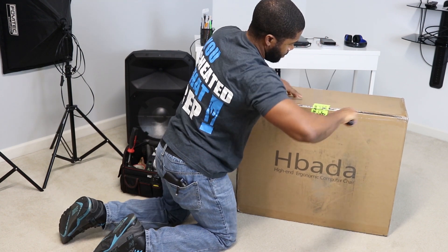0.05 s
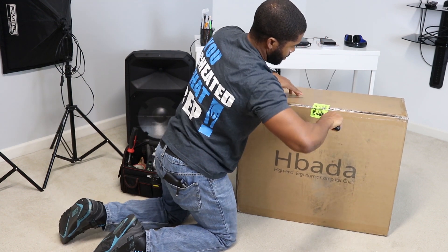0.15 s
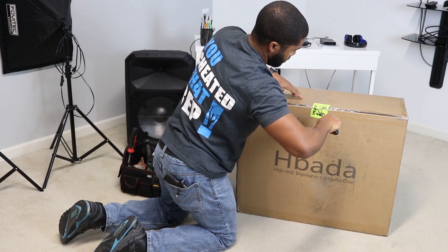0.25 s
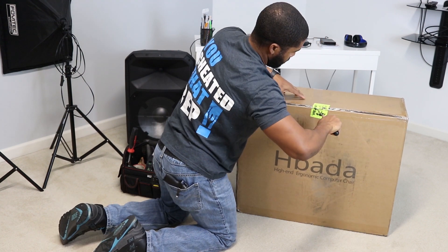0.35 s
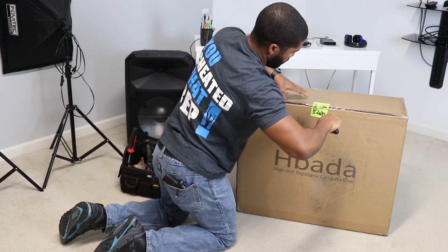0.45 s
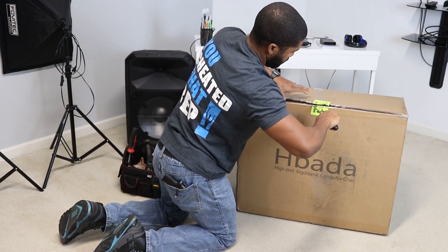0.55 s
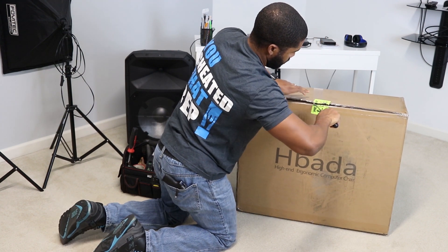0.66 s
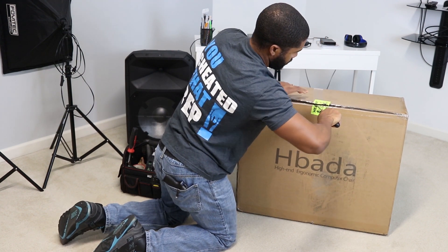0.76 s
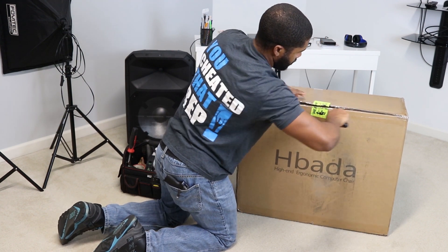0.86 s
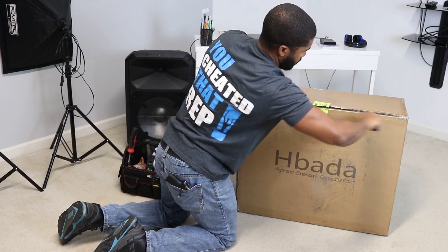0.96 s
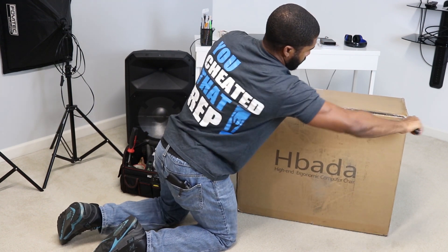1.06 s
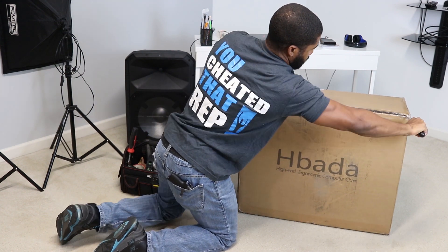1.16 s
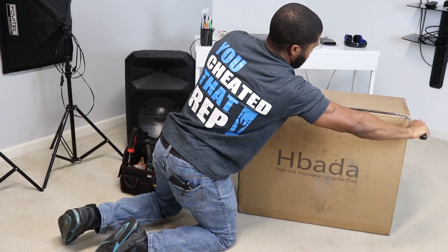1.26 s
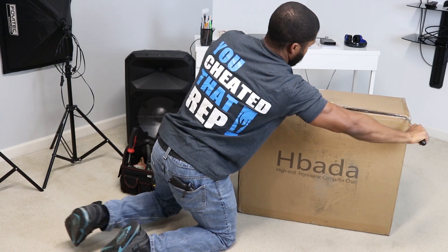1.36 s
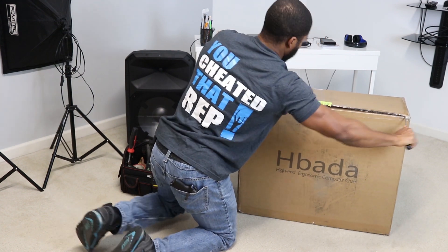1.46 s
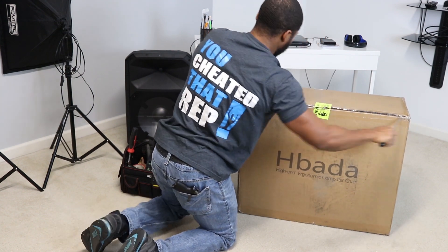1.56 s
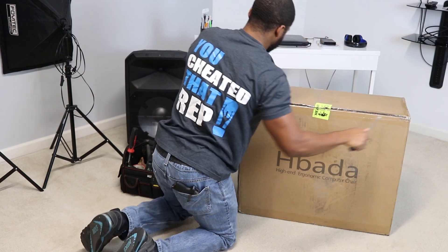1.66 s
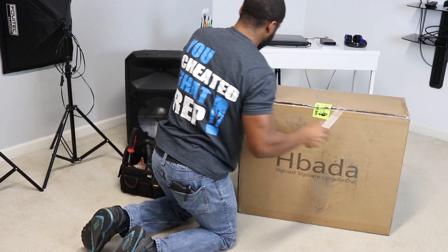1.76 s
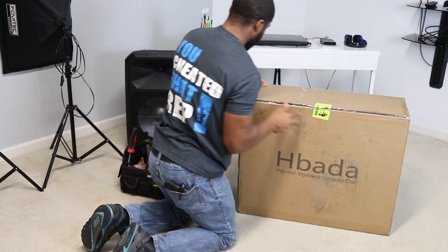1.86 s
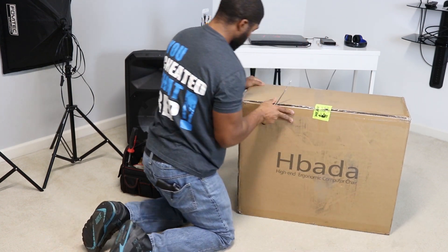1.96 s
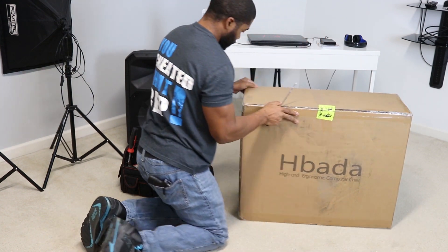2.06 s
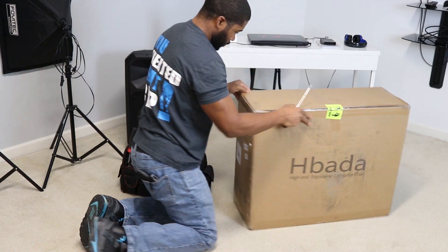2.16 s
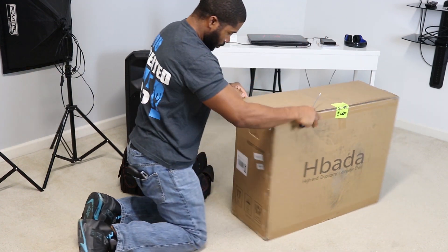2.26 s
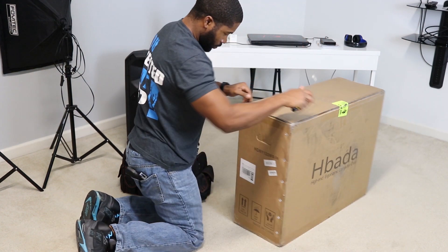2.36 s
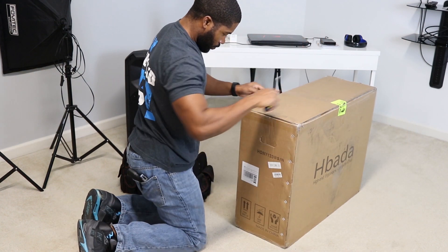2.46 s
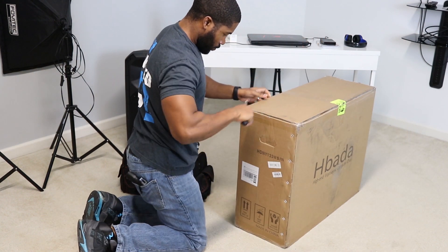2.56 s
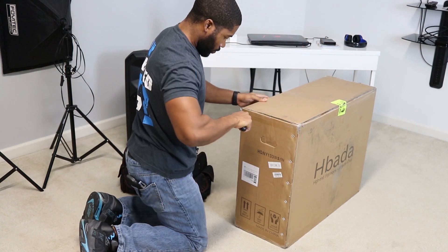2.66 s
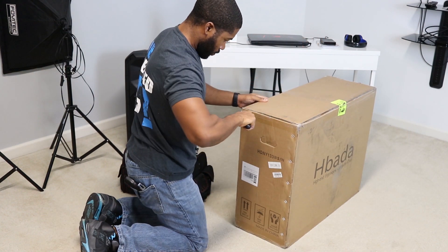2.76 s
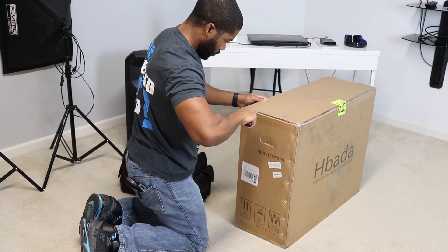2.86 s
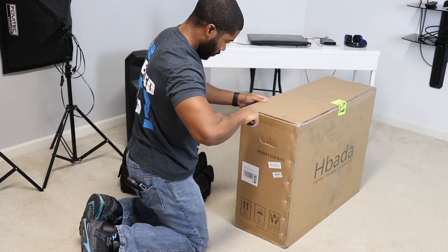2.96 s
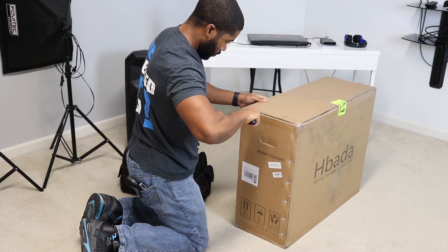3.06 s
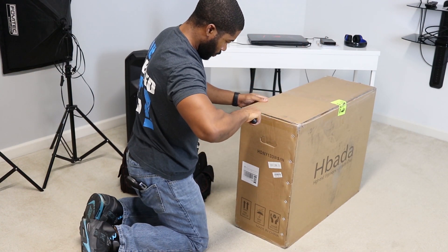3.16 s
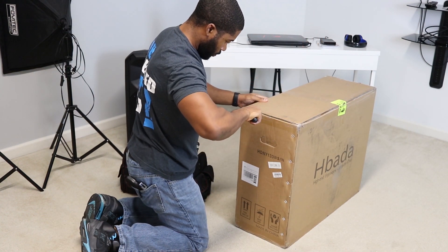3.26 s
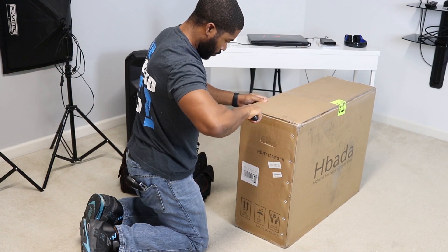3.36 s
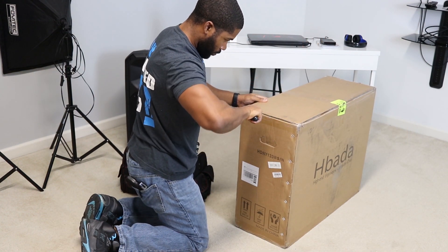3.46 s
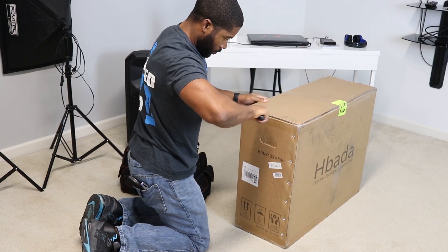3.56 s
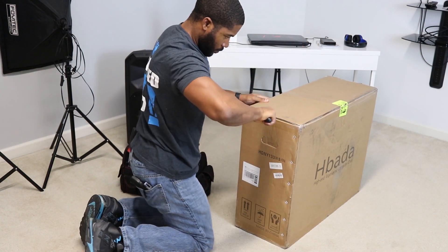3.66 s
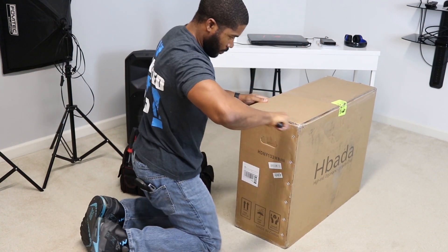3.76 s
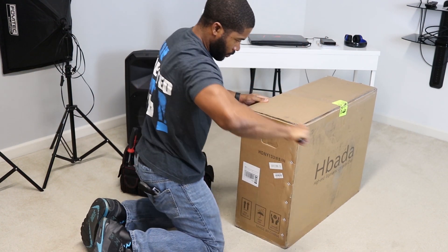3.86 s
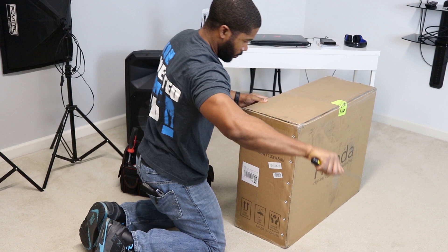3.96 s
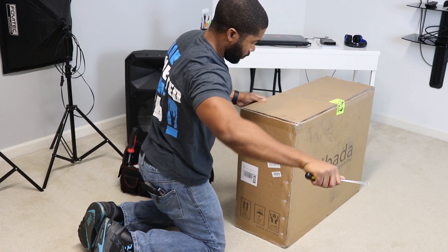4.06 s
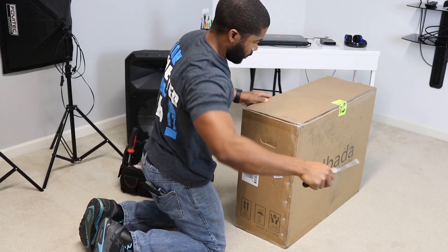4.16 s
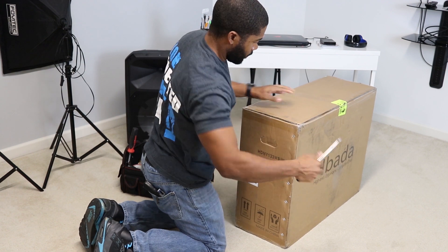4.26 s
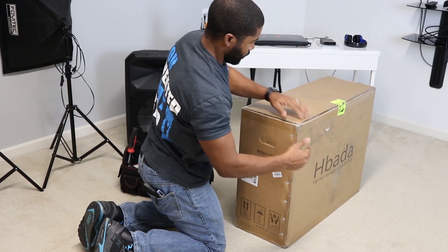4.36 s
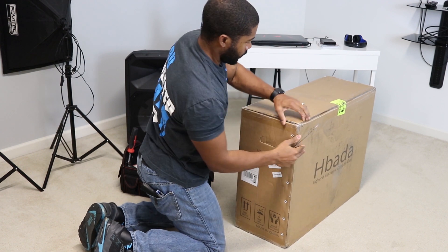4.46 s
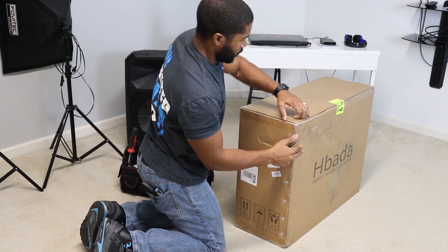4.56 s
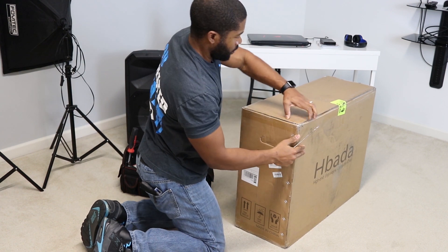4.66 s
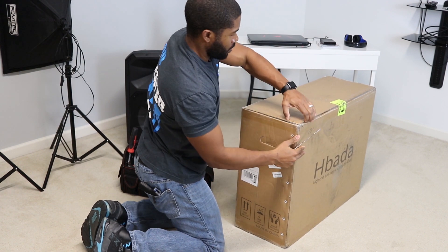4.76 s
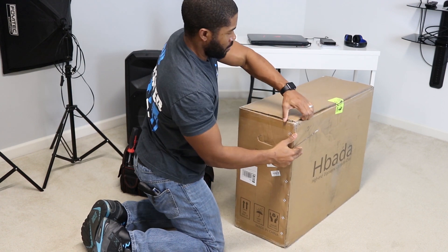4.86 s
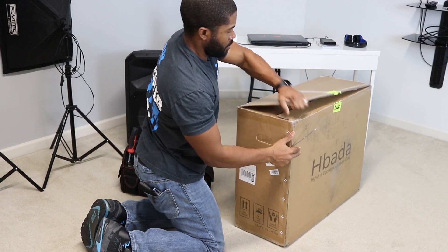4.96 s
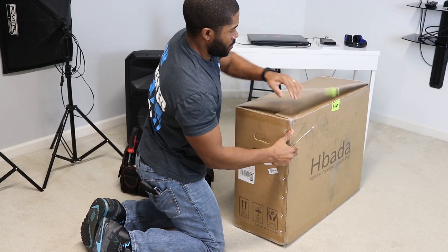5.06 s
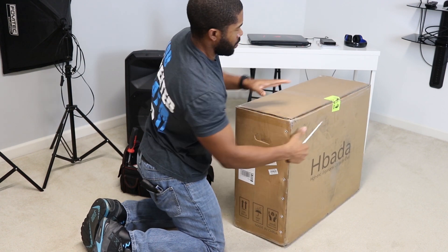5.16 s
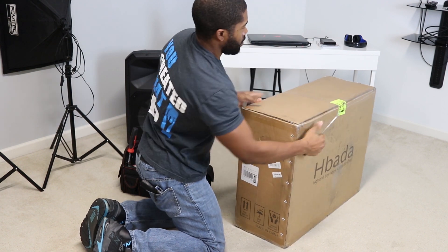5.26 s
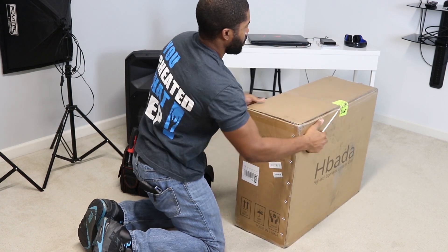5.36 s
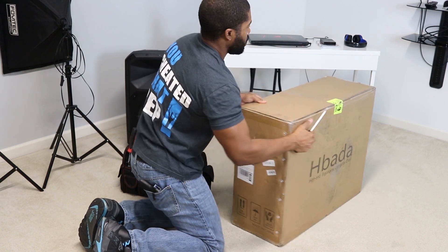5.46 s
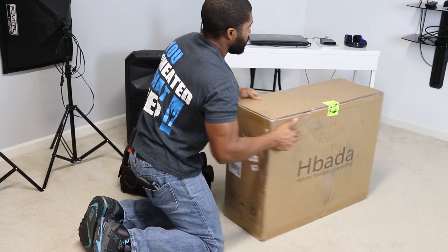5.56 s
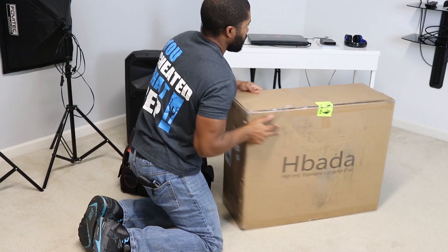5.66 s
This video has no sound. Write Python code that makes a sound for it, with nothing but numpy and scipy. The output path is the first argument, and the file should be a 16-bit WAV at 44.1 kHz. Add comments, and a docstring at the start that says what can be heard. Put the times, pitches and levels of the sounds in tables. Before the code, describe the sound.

A blade rips packing tape on a large hollow cardboard box, which is dragged over carpet, then snapped and thumped open in an echoing room.

```python
"""A bare, echoing room with a carpet, where a large cardboard box is cut open: a blade rips its tape while hands
rub, knock and drag it. Friction and snaps are shaped noise; jolts and blows excite resonances of flaps and body.
An appliance hums faintly as narrow bands of noise, and decaying noise tails give the echoes.
Two close microphone ports listen from a few metres away."""
import sys
import numpy as np
from scipy import signal
from scipy.fft import rfft, irfft, next_fast_len
from scipy.io import wavfile
from scipy.ndimage import map_coordinates

SR = 44100
rng = np.random.default_rng(int(sys.argv[2]) if len(sys.argv) > 2 else 0)


def magnitude_from_level(level_db):
    """Linear magnitude for a level in decibels (20 dB per decade)."""
    exponent = np.asarray(level_db, float) / 20
    return 10 ** exponent


def output_pcm(signal):
    """Save a mono or channel-first signal as 16-bit PCM at the path in sys.argv[1].

    Samples are clipped to [-1, 1] before scaling.
    """
    pcm = np.clip(np.atleast_2d(signal).T, -1, 1) * 32767
    wavfile.write(sys.argv[1], SR, np.round(pcm).astype(np.int16))


N = 251370  # length [samples]

# All event and spectrum levels are relative. Rise and fall are times for 20 dB; any below 2 ms count as 2 ms.
# Spectrum of the quiet room: (frequency [Hz], level per Hz [dB])
STILL_SPECTRUM = [(15, -42), (25, -18), (130, 4.5), (277, -11.5), (714, -11), (796, -19), (1040, -20),
                  (1190, -20.5), (7710, -35), (13200, -42), (14800, -42), (16000, -66)]
# Wavering appliance tones: (centre [Hz], width [Hz], level [dB])
HUM_TONES = [(59.2, 2.5, 11.5), (119.9, 7.5, 7), (179, 15, -11)]
# Reverberation of the bare walls: (frequency [Hz], t60 [s])
ROOM_DECAY = [(100, 0.31), (500, 0.49), (2000, 0.53), (6000, 0.58), (14000, 0.33)]
# Likeness of left and right: (frequency [Hz], correlation [1])
LIKENESS = [(60, 0.98), (130, 0.99), (250, 0.97), (400, 0.91), (1200, 0.42), (2500, 0.041), (12000, 0.014)]
# Sensitivity of the left port over the right: (frequency [Hz], level [dB])
PORT_BALANCE = [(60, 1), (700, 0.5), (1500, 0), (2600, -2), (5500, 0), (9500, -2), (13500, -10)]
# Pulls that slide the box: (peak time [s], rise [s], fall [s], level [dB])
DRAG_PULLS = [(1.95, -0.7, 0.5, -51.5), (2.04, 0.02, 0.29, -36), (2.22, 0.25, 0.3364, -35),
              (2.4, 0.21, 0.21, -36), (2.548, 0, 0.05, -41)]
# Spectrum of carpet friction: (frequency [Hz], level per Hz [dB])
CARPET_SPECTRUM = [(410, -20), (700, -3), (898, -7), (1710, -1), (1870, -3), (2000, -4.5), (7490, -4.5),
                   (13300, -16), (16000, -20)]
# Resonances of the hollow box: (centre [Hz], width [Hz], level [dB])
BODY_MODES = [(108, 41, 0.5), (140, 44, 2.5), (189, 18.7, 0.5), (222.4, 49, -2), (292, 118, -9)]
# Resonances of the flaps, two long then three short: (centre [Hz], width [Hz], level [dB])
FLAP_MODES = [(394, 123, -1.5), (571, 146, -1), (700, 170, -3.5), (919, 123, -2), (1100, 460, -8)]
# Blows that boom in the box: (time [s], blow level [dB], floor thud over blow [dB])
BLOWS = [(0.189, -20, -3), (0.833, -28.5, -21), (2.036, -12.5, -12), (2.164, -8.5, -28), (3.895, 4.5, -53),
         (4.018, 5, -44), (4.037, -1.5, -45), (4.498, -7, -13), (5.005, -7, -32.5), (5.2, 4.5, -9),
         (5.458, -10.5, 3)]
# Jolts that shake the walls: (peak time [s], rise [s], fall [s], flap level [dB], hollow body level [dB])
WALL_JOLTS = [(0.0, .01, 0.0124, -22.5, -40), (0.207, 0.4, 0.35, -53.5, -44), (0.512, -0.03, 0, -43, -39),
              (.608, 0.1, -0.13, -42.5, -40), (.836, 0.2, 0.8, -56.5, -54), (.942, 0.19, 0.6, -55, -37.5),
              (1.075, 0.0524, 0.1035, -19.5, -30), (1.12, 0.0541, 0.11, -18, -33.5),
              (1.159, 0.0849, 0.0844, -15.5, -36), (1.25, 0.13, 0.09, -30, -40),
              (1.438, 0.1, 0.5, -45, -49.5), (1.58, -0.06, 0.1, -43, -41), (1.71, 0.27, 0.1, -47.5, -38.5),
              (1.946, -0.12, 0.1, -43.5, -35), (2.054, 0.08, 0.11, -39.5, -33.5),
              (2.172, 0.06, 0.0841, -39.5, -32), (2.35, 0.45, 0.3443, -47.5, -47),
              (2.5, 0.17, 0.11, -45, -60.5), (2.694, 0.73, 0.2, -54.5, -51), (2.892, 0.2, 0.7, -65, -56),
              (3.532, 0.26, 1, -62.5, -52.5), (3.672, -0.06, 0.18, -37.5, -38),
              (3.703, 0.04, 0.1, -48, -28), (3.8, 0.04, 0.12, -33, -34.5), (3.86, 0.01, 0.0957, -28.5, -31),
              (3.899, -0.0029, 0.0964, -20.5, -12.5), (3.929, 0.0169, 0.15, -36, -21),
              (4.012, 0.0673, 0.0874, -23.5, -27), (4.035, -0.01, 0.06, -41, -25),
              (4.13, 0, 0.18, -44, -46), (4.502, -0.01, 0.18, -41, -28.5), (4.68, 0.23, 0.2, -44, -33),
              (4.903, 0.01, 0, -35, -31), (5.014, 0.03, 0.11, -30, -26), (5.156, -0.0034, 0.19, -18.5, -24),
              (5.206, 0.01, 0.16, -16, -18), (5.491, 0.29, 0.08, -34.5, -30.5), (5.7, 0.6, -2, -53, -40.5)]
# Jolts that reach the short flaps alone: (peak time [s], rise [s], fall [s], level [dB])
SHORT_FLAP_JOLTS = [(0.0, .01, 0.17, -29.5), (1.085, 0.05, 0.02, -22.5), (1.144, 0.0433, 0.04, -24),
                    (2.503, 0.012, 0.07, -42), (3.673, -0.0057, 0, -33.5), (4.902, 0.25, 0.8, -52),
                    (5.009, 0.08, 0.15, -42), (5.153, 0.0044, 0.05, -29), (5.204, 0.0046, 0.17, -21)]
# Knocks of hand or blade tip on one panel, whose note depends on where it is struck and held:
# (time [s], level [dB], nominal note [Hz], t60, at least 0.02 [s])
PANEL_KNOCKS = [(1.937, -26, 112, 0.22), (1.993, -23.5, 121, 0.078), (2.034, -24.5, 190, 0.12),
                (2.042, -31, 293, 0.19), (2.083, -25.5, 111, 0.18), (2.162, -33.5, 501, 0.088),
                (2.168, -27.5, 129.7, 0.2), (4.5, -17, 115.6, 0.21), (4.545, -18.5, 142, 0.16),
                (4.836, -33, 115, 0.13), (4.993, -24.5, 112.8, 0.18), (5.004, -22, 179, 0.13),
                (5.152, -17.5, 768, 0.16), (5.16, -20, 413, 0.19), (5.2015, -6, 450, .04),
                (5.2025, -9, 800, .04), (5.204, -12.5, 113, 0.21), (3.8987, -6, 170, .07),
                (4.036, -10, 171, .06), (0.51, -33, 2900, .02), (1.5422, -36, 1370, 0.023),
                (3.0924, -48, 2900, .02), (3.5585, -47, 1620, .025), (3.6685, -19, 3430, 0.024)]
# Blade or hand keeps one flap or strip of tape humming:
# (peak time [s], rise [s], fall [s], level [dB], centre [Hz], width [Hz])
HELD_NOTES = [(0.0, .01, 0.17, -27, 925, 109), (.512, -0.02, 0.1, -44, 2930, 800),
              (1.068, 0.1, 0.0148, -18, 592, 110), (1.087, 0.05, -0.01, -16, 704, 130),
              (1.112, 0.03, 0.05, -19.5, 420, 90), (1.16, .04, -0.01, -19.5, 517, 120),
              (1.239, 0.03, 0.0143, -25.5, 437, 90), (3.669, -0.0242, 0.05, -31, 3480, 600),
              (3.835, 0.01, 0.11, -32, 3300, 600), (5.206, 0.01, 0.22, -21.5, 1780, 1210)]
# Tape snaps and blade ticks:
# (time [s], ring level [dB], ring centre [Hz], bright crack level [dB], flap knock over ring [dB])
TAPE_SNAPS = [(0.1832, -25, 1820, -39.5, -14), (0.346, -28.5, 2940, -56, -15.5),
              (0.5108, -22.5, 3130, -45, -10), (0.5793, -35, 3080, -48, -15), (0.594, -37, 3020, -45, -10),
              (0.702, -35, 5000, -50, -15), (0.8987, -34, 1690, -52, -13), (0.9715, -28, 2290, -46, 1),
              (1.0287, -24.5, 1500, -37, 11), (1.5422, -23.5, 1350, -55, 1), (1.657, -23, 1580, -41, -8.5),
              (2.199, -28.5, 5230, -33.5, -13.5), (2.748, -42, 2010, -54, -19),
              (3.0921, -35, 2880, -63, -17), (3.242, -56, 1620, -54, -20.5), (3.3408, -41, 1850, -48, -23),
              (3.354, -50, 8500, -54, -25), (3.367, -52, 7000, -57, -25), (3.5585, -35, 1520, -63.5, -13),
              (3.571, -51, 7120, -55, -22.5), (3.662, -36, 4000, -49, -21), (3.6685, -13, 3430, -22.5, -29),
              (3.678, -22, 2500, -24.5, -21), (3.8903, -13.5, 1560, -38, 11.5),
              (3.963, -11.5, 2180, -28, -11), (4.009, -25, 2010, -25, -10), (4.4951, -27, 4480, -31, -11),
              (4.666, -35, 6500, -47, -14), (4.7387, -22.5, 4600, -40, -20),
              (4.7626, -27.5, 4630, -37.5, -29), (4.899, -31, 6000, -43, 7.5), (4.999, -21, 2800, -33, -5),
              (5.007, -24.5, 7350, -33, -15), (5.1502, -19.5, 5600, -21.5, 11),
              (5.2034, -9.5, 2100, -24.5, 10), (5.4086, -16, 1550, -40, -14),
              (5.5905, -27.5, 2270, -38, -17.5)]
# Rubbing and ripping strokes: (peak time [s], rise [s], fall [s], rasp level [dB], brightness of hiss [dB])
RUBS_AND_RIPS = [(0.0, .01, 0.1148, -27.5, 7.5), (.1, 10.8, 0.28, -41.5, -10.5),
                 (.195, 0, 0.12, -39.5, -1.5), (0.302, -0.03, 0.12, -44, 7), (0.51, -0.1, 0.13, -41, 0),
                 (.59, 0.02, 0.02, -38.5, 2), (.71, 0.5, 0.06, -51.5, 4), (.8, 0, 0.5, -56, 0),
                 (.896, 0.1, -0.3, -53.5, 4), (0.983, 0.03, 0.06, -37.5, -6.5),
                 (1.045, 0.0534, 0.08, -33.5, 1.5), (1.09, 0.0256, 0.09, -25.5, 1.5),
                 (1.141, 0.0639, 0.04, -29, 7.5), (1.352, 0.49, 0.5, -46, -4.5),
                 (1.601, 0.32, 0, -42.5, -4), (1.664, 0.1, 0.15, -40.5, -6), (1.71, 0.09, 0.07, -35, 0),
                 (1.95, 0.1, 1.5, -50.5, 4.5), (2.74, -2, 0.32, -64, 0), (3.095, -0.57, 0.25, -60, -1),
                 (3.26, 0.03, 0.06, -69, 11), (3.35, -0.02, 0.13, -61, 11), (3.58, 0.2, 0.6, -59, 3.5),
                 (3.669, 0.003, 0.12, -27, 5), (3.72, 0.0459, .15, -37.5, -11),
                 (3.835, .09, 0.0646, -31, 3.5), (3.888, 0.0677, 0.033, -25, 2.5),
                 (3.962, -0.0131, 0.09, -21.5, -1), (4.022, 0.08, 0.0551, -22, -1),
                 (4.19, 0.13, 0.3, -47, -13), (4.33, 0.2, 0.2, -50.5, 1.5), (4.497, 0.01, 0.16, -43, 4.5),
                 (4.639, 0.13, 0.1, -43.5, 7), (4.741, 0.002, 0.1, -42.5, 2), (4.79, 0.05, 0.1, -46.5, -2),
                 (4.907, 0.01, 0.23, -37.5, -2), (5, -0.1, 0.12, -31.5, 3.5), (5.09, 0, 0.2, -43.5, 8),
                 (5.151, -0.0129, 0.12, -28, 8), (5.204, -0.005, 0.18, -18.5, -9.5),
                 (5.42, -0.2, 0.03, -41, 7), (5.52, 0.22, -0.1, -45, 0.5), (5.7, 0.3, 0.5, -41, 3)]
# Crinkles of the plastic tape film: (peak time [s], rise [s], fall [s], level [dB])
FILM_CRINKLES = [(0.0, .01, 0, -43), (.19, -0.2, 0.03, -42), (.3, 0.1, 0.06, -48), (.59, 0.3, 0, -55),
                 (.712, -0.16, 0.06, -49), (.89, 0, .05, -60), (.98, -0.2, 0.2, -47),
                 (1.05, 0.02, 0.07, -31), (1.1, 0.0066, 0.0658, -25), (1.15, 0, 0.05, -31),
                 (1.35, 0.5, 0.88, -58.5), (1.6, 0, 0.14, -45.5), (1.7, 0, 0, -34), (1.95, 0.06, 1, -52),
                 (3.35, 0.4, 0.04, -62), (3.58, 0.3, 0.03, -65), (3.673, 0.01, -0.09, -26),
                 (3.875, 0.11, 0.06, -36), (3.967, -0.05, 0.11, -30.5), (4.19, 0.1, .08, -54),
                 (4.33, 0.1, -0.2, -45.5), (4.495, -0.02, 0.3, -45), (4.62, 0.3, 6, -59),
                 (5.005, -0.11, 0.1, -41), (5.105, 0.03, 0, -36), (5.155, -0.04, 0, -32.5),
                 (5.43, -0.37, 0.4, -43.5), (5.53, -0.1, -0.1, -41), (5.7, -0.45, -5, -45)]
# Spectra of rasp, paper fibres and plastic film: (frequency [Hz], level per Hz [dB])
RASP_SPECTRUM = [(500, 3), (1200, 3.5), (2000, 2.5), (3500, 3), (5000, -3), (7000, -20.5), (10000, -24),
                 (16000, -95)]
HISS_SPECTRUM = [(3000, -10), (6000, 3.5), (8000, 2.5), (10000, -4.5), (13000, -24), (16500, -44)]
SIZZLE_SPECTRUM = [(7000, -12), (10500, -5), (13500, -2.5), (15500, -6), (17000, -7.5)]


def unit(x):
    """Normalization: x at rms 1."""
    return x / np.sqrt(np.mean(x ** 2) + 1e-20)


def along(points, hz):
    """Interpolation of (frequency, value) points on a logarithmic frequency axis."""
    f, v = np.transpose(points)
    return np.interp(np.log(hz + 1), np.log(f + 1), v)


def filtered(x, response):
    """Linear filtering: the spectrum of x times a complex response of frequency."""
    m = next_fast_len(x.shape[-1] + SR // 2)
    hz = np.fft.rfftfreq(m, 1 / SR)
    return irfft(rfft(x, m) * response(hz), m)[..., :x.shape[-1]]


def modes(table):
    """Modal superposition: damped resonances of alternating sign sum to one causal response."""
    def response(f):
        total = 0
        for k, (centre, width, db) in enumerate(table):
            resonance = 1j * f * width / (centre * centre - f * f + 1j * f * width)
            total = total + (-1) ** k * magnitude_from_level(db) * resonance
        return total
    return response


def wobble(rate):
    """Slow random modulation: a smooth curve through rate random knots a second."""
    return map_coordinates(rng.standard_normal(N // 40), [np.arange(N) * rate / SR])


def swells(s, rise, fall, db):
    """Envelope of gestures: each rises and fades at its own speed, and their powers add."""
    t = np.arange(0, N + 32, 32)[:, None] / SR
    before_peak = (s - t) / np.maximum(rise, 0.002)
    after_peak = (t - s) / np.maximum(fall, 0.002)
    away = np.maximum(before_peak, after_peak)
    level_db = db - 20 * away ** 1.373  # rounded at the peak, steeper away from it
    gain = np.sqrt(np.sum(magnitude_from_level(level_db) ** 2, axis=1))
    return np.interp(np.arange(N) / SR, t[:, 0], gain)


def spread(pair):
    """Partial coherence: two unrelated signals become left and right, alike in the bass."""
    def mid_side(hz):
        angle = np.arccos(np.clip(along(LIKENESS, hz), -1, 1)) / 2
        return np.array([np.cos(angle), np.sin(angle)])
    mid, side = filtered(pair, mid_side)
    return np.array([mid + side, mid - side])


def slips(spike_db, clump_db):
    """Stick-slip friction: dense grains of uneven, bounded size in clumps, from two parts of a wide surface."""
    spikes = np.minimum(rng.exponential(size=N), 4)
    clumps = np.tanh((wobble(60) + wobble(250)) / 2)
    return magnitude_from_level(spike_db * spikes + clump_db * clumps) * rng.standard_normal((2, N))


def hollow(f):
    """Cavity resonance: the modes of the body, weakened where the box is too small to radiate."""
    small_hz = 71
    return modes(BODY_MODES)(f) * (1j * f / (small_hz + 1j * f)) ** 2


def still_air():
    """Background noise: distant rumble and hiss, with a hum of narrow noise bands that waver."""
    noise = rng.standard_normal((2, N))
    air = spread(filtered(noise, lambda hz: magnitude_from_level(along(STILL_SPECTRUM, hz))))
    hum = filtered(rng.standard_normal(N), modes(HUM_TONES))
    air_db = -53 + 0.43 * wobble(3.64)
    return magnitude_from_level(air_db) * unit(air) + magnitude_from_level(-51.0) * unit(hum)


def room(x):
    """Diffuse reverberation: each frequency dies at its own speed, in fresh random tails for short sections."""
    step = SR // 13
    out = np.zeros((2, N + 3 * SR))
    fade = np.sqrt(signal.get_window("hann", 2 * step))  # unrelated tails add in power
    x = np.pad(x, (step, 2 * step))
    for start in range(0, N + step, step):
        hz, t, z = signal.stft(rng.standard_normal((2, SR // 2)), SR, nperseg=256)
        decay = magnitude_from_level(-60 * t / along(ROOM_DECAY, hz)[:, None])
        tail = signal.istft(z * decay, SR, nperseg=256)[1]
        tail = np.pad(tail / np.linalg.norm(tail[0]), ((0, 0), (200, 0)))  # echoes start 200 samples late
        section = fade * x[start:start + 2 * step]
        echo = signal.fftconvolve(section[None], tail, axes=1)
        out[:, start:start + echo.shape[1]] += echo
    return out[:, step:step + N]


def drag():
    """Sliding friction: the box turns on the carpet, and countless fibres give an even hiss."""
    fibres = slips(spike_db=-1.5, clump_db=2.5)
    hiss = unit(filtered(fibres, lambda hz: magnitude_from_level(along(CARPET_SPECTRUM, hz))))
    return swells(*np.transpose(DRAG_PULLS)) * hiss


def thumps():
    """Impulsive excitation: a soft palm pushes the wall briefly; the hollow rings and the floor thuds low."""
    s, db, thud_db = np.transpose(BLOWS)
    at = np.round(s * SR).astype(int)

    def pushes(level_db, push_s):
        blows = np.zeros(N)
        blows[at] = magnitude_from_level(level_db)
        return np.convolve(blows, np.hanning(round(push_s * SR)))[:N]

    boom = filtered(pushes(db, 0.0023), hollow)
    thud = filtered(pushes(db + thud_db - 4.0, 0.0041), modes([(45, 11, 0)]))
    return (boom + thud) * [[1], [0]]  # one compact source


def shaking():
    """Forced vibration: uneven jolts drive flaps and body, which ring on after the level has acted."""
    soft_hz = 4200  # palms and card are soft: jolts carry little above this
    grains = slips(spike_db=2.5, clump_db=4.5)
    jolts = filtered(grains, lambda hz: 1 / (1 + (hz / soft_hz) ** 2))
    s, rise, fall, flaps_db, body_db = np.transpose(WALL_JOLTS)
    long_flaps = swells(s, rise, fall, flaps_db)
    short_flaps = magnitude_from_level(-2.5) * long_flaps + swells(*np.transpose(SHORT_FLAP_JOLTS))
    body = swells(s, rise, fall, body_db)
    parts = [(long_flaps, modes(FLAP_MODES[:2])), (short_flaps, modes(FLAP_MODES[2:])), (body, hollow)]
    return sum(filtered(gain * jolts, wall) / filtered(jolts[0], wall).std() for gain, wall in parts)


def knocks():
    """Free vibration: each knock is one damped note with a soft start."""
    attack_cycles = 0.7  # time constant of the start
    out, t = np.zeros(N + SR), np.arange(SR // 2) / SR
    for (s, db, hz, t60), wander in zip(PANEL_KNOCKS, rng.standard_normal(len(PANEL_KNOCKS))):
        tone = np.sin(2 * np.pi * hz * (1 + 0.016 * wander) * t)
        attack = 1 - np.exp(-t * hz / attack_cycles)
        decay = magnitude_from_level(db + 2.5 - 60 * t / max(t60, 0.02))
        out[round(s * SR):][:len(t)] += decay * tone * attack
    return out[:N] * [[1], [0]]


def humming():
    """Sustained resonance: random jolts pass twice through one resonance of a flap or strip of tape."""
    jolts = rng.standard_normal((2, N))
    out = np.zeros((2, N))
    for s, rise, fall, db, hz, width_hz in HELD_NOTES:
        resonance = modes([(hz, width_hz, 0)])
        note = unit(filtered(jolts, lambda f: resonance(f) ** 2))
        out += swells(s, rise, fall, db) * note
    return out


def snaps():
    """Sudden release: each snap gives a short rough ring, a bright crack and a knock on the flaps."""
    burst_t60_s = 0.029
    out, flap_hits, t = np.zeros((2, N + SR)), np.zeros(N), np.arange(SR // 8) / SR
    noises = rng.standard_normal((len(TAPE_SNAPS), 2, len(t)))
    bright = modes([(9500, 11000, 0)])
    for (s, db, hz, crack_db, knock_db), noise in zip(TAPE_SNAPS, noises):
        at = round(s * SR)
        burst = noise * magnitude_from_level(-60 * t / burst_t60_s)
        width_hz = 0.44 * hz * magnitude_from_level((db + 33.0) / 6)  # harder slaps ring less purely
        resonance = modes([(hz, width_hz, 0)])
        ring = filtered(burst, lambda f: resonance(f) ** 2)
        crack = filtered(burst ** 3, lambda f: bright(f) ** 2)  # the cube leaves a few sharp spikes
        out[:, at:][:, :len(t)] += magnitude_from_level(db + 7.0) * ring + magnitude_from_level(crack_db + 1.0) * crack
        flap_hits[at] = magnitude_from_level(db + knock_db + 26.5)
    return out[:, :N] + filtered(flap_hits, modes(FLAP_MODES)) * [[1], [0]]


def strokes():
    """Stick-slip of blade and fingers on tape and card: a rasp, a hiss of paper fibres, a thin sizzle of film."""
    grains = slips(spike_db=2.5, clump_db=4)
    spectra = (RASP_SPECTRUM, HISS_SPECTRUM, SIZZLE_SPECTRUM)
    rasp, hiss, sizzle = [unit(filtered(grains, lambda hz: magnitude_from_level(along(colour, hz)))) for colour in spectra]
    s, rise, fall, db, bright_db = np.transpose(RUBS_AND_RIPS)
    rasping = swells(s, rise, fall, db) * rasp
    hissing = swells(s, rise, 0.78 * fall, db - 5.5 + bright_db) * hiss  # fades sooner than the rasp
    sizzling = swells(*np.transpose(FILM_CRINKLES)) * sizzle
    return rasping + hissing + sizzling


def scene():
    """Arrival-time difference: the wide box is a little to the right; its direct sound reaches the left later."""
    box = strokes() + drag() + shaking() + snaps() + thumps() + knocks() + humming()
    lag_s = np.array([[0.000022], [-0.000022]])  # left, right
    direct = filtered(spread(box), lambda hz: np.exp(-2j * np.pi * hz * lag_s))
    echoes = spread(room(box[0]))
    return magnitude_from_level(-0.5) * direct + magnitude_from_level(-5.5) * echoes + still_air()


def top_cut(x):
    """Nothing passes above the cut-off."""
    return signal.sosfilt(signal.butter(12, 16690, fs=SR, output="sos"), x)


def record(dry):
    """Port balance and filtering: the deep bass fades and a steep low-pass ends the treble."""
    low_cut_hz, low_pass_hz = 23, 16000
    halves = np.array([[0.5], [-0.5]])  # each port takes half the difference in dB
    ports = filtered(dry, lambda hz: magnitude_from_level(along(PORT_BALANCE, hz) * halves) / (1 + (hz / low_pass_hz) ** 40))
    ports = filtered(ports, lambda hz: (1j * hz / (low_cut_hz + 1j * hz)) ** 2)
    mix = np.clip(ports, -1, 1)
    return top_cut(mix)


dry = scene()
out = record(dry)
output_pcm(out)
```